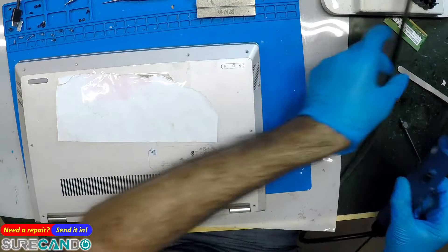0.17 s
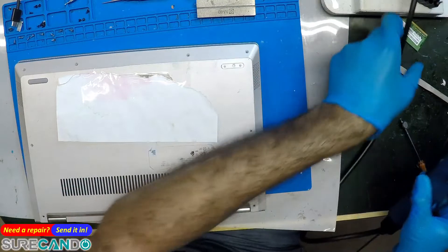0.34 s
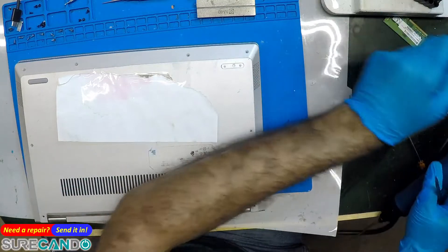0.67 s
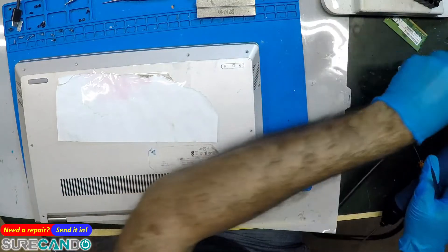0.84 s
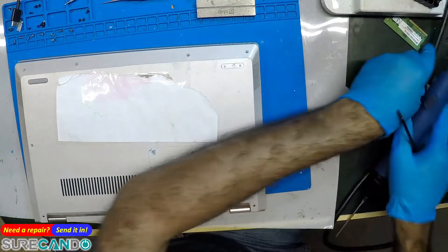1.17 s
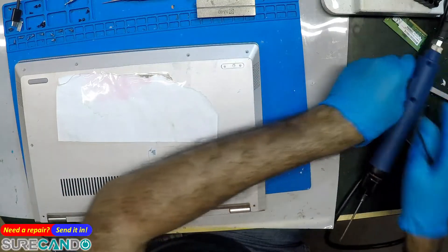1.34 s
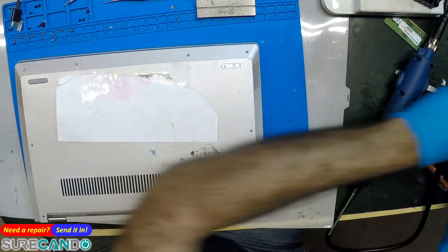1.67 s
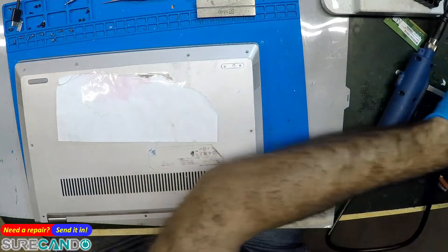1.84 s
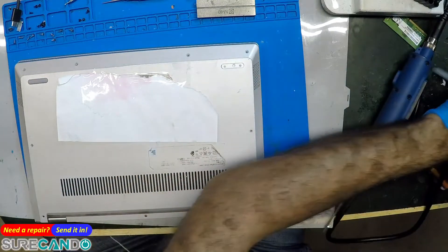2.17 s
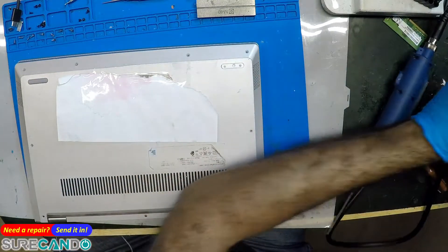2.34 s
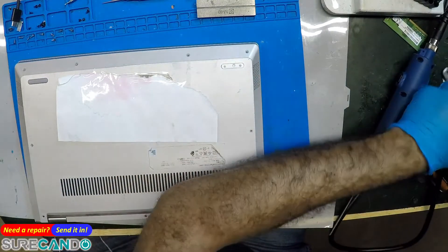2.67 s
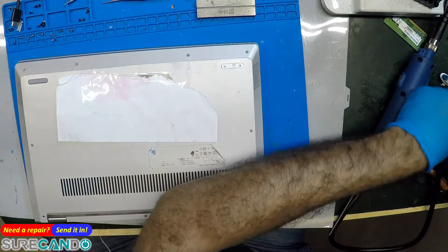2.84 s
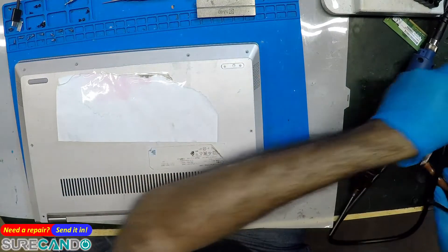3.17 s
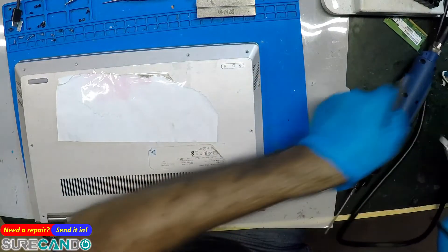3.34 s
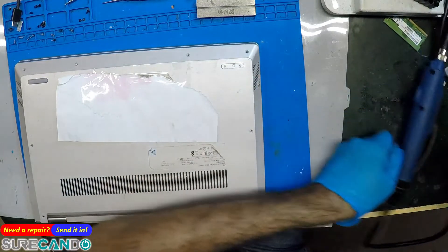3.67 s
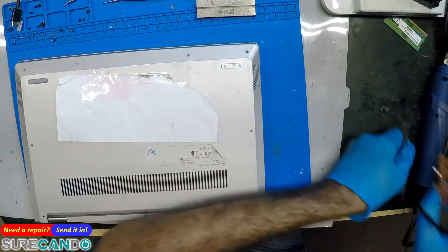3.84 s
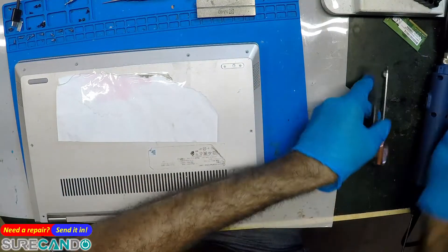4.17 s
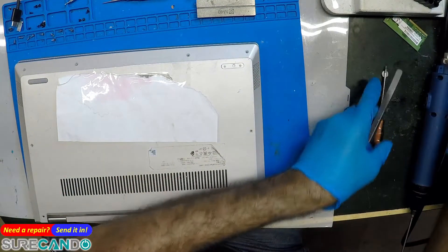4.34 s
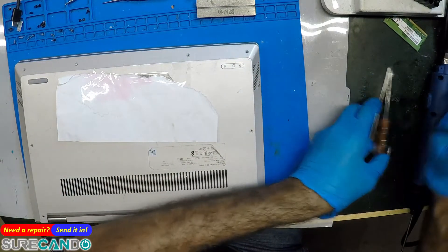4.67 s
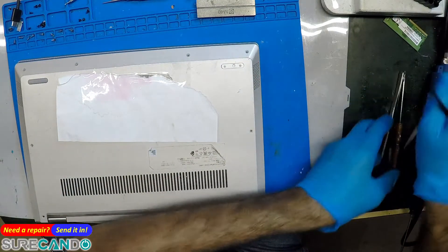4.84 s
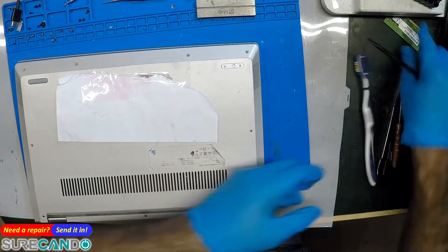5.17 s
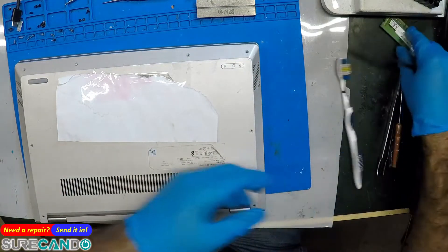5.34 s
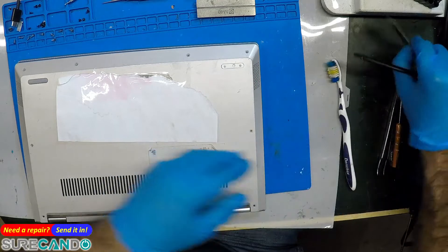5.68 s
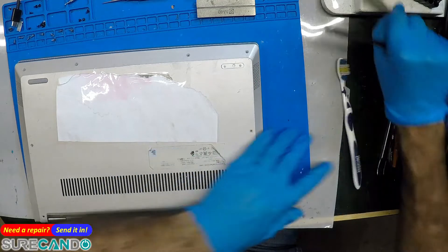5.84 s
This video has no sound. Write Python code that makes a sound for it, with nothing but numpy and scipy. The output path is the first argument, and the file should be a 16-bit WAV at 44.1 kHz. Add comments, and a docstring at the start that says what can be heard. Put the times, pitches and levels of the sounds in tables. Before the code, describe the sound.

Close, nearly mono bench sound with soft fan air behind. A brief buzzy motor burst comes first, then sparse dull knocks and dry plastic ticks. Around the middle, faint metal tinkles and glove rustle thicken into quicker clicks, topped by one strong crack with a low thump. Crisp steel jingles come next, then another firm knock, then quiet rubbing and small ticks in a small room.

```python
"""A fan's air noise hums in a small workshop, then a cordless screwdriver whirrs once on the repair bench.
Handles and cable knock and tick on the bench top as decaying noise through resonances and bench modes.
Steel tweezers, picks and a shaft clink as sums of ringing modes; gloves and cable rub as stick-slip noise.
One close microphone pickup feeds both channels, with a short room tail behind the knocks, ticks, clinks
and motor, and a faint noise of opposite sign in the two channels."""
import sys
import numpy as np
from scipy import signal
from scipy.fft import rfft, irfft
from scipy.io import wavfile
from scipy.ndimage import uniform_filter1d

SR = 44100
rng = np.random.default_rng(int(sys.argv[2]) if len(sys.argv) > 2 else 0)


def to_wav(sig):
    """Store sig (one row per channel, or 1-D mono) as 16-bit WAV at the path in sys.argv[1].

    Samples outside -1..1 are clipped; the rate is SR.
    """
    pcm = np.clip(np.atleast_2d(sig), -1, 1) * 32767
    pcm = np.round(pcm).astype(np.int16)
    wavfile.write(sys.argv[1], SR, pcm.T)  # frames by channels


N = 264996
T = np.arange(N) / SR

# rubbing of gloves and cable: (t/s, drag through the bench level/dB, scrape level/dB)
RUB = [(0.0, -79, -80), (0.37, -62.5, -74), (0.6, -71, -75), (1.34, -64, -71), (2.12, -69.5, -72.5),
       (2.49, -60.5, -69), (2.66, -60.5, -71), (2.83, -81, -81.5), (3.0, -68.5, -75), (3.12, -61.5, -71),
       (3.41, -57, -65.5), (3.62, -63.5, -71), (4.0, -70, -77.5), (4.25, -66.5, -71), (4.57, -64.5, -69.5),
       (4.79, -65, -71), (5.17, -62, -72), (5.66, -67.5, -74.5), (6.01, -70, -87)]
# treble colour of hiss and of the spit in a tick: (f/Hz, level/dB)
HISS = [(2500, -65), (5500, -7), (11000, -8.5), (15500, -19.5)]


def undb(db):
    """Decibels to an amplitude factor."""
    return 10 ** (np.asarray(db) / 20)


def unit(x):
    """Scaled to rms 1."""
    return x / np.sqrt(np.mean(x ** 2))


def peak(x):
    """Scaled to peak 1."""
    return x / np.abs(x).max()


def colour(x, points):
    """Filtered by (f/Hz, level/dB) points, joined by straight lines over log frequency."""
    hz, db = np.transpose(points)
    f = np.maximum(np.arange(len(x) // 2 + 1) * SR / len(x), 1)
    gain = undb(np.interp(np.log(f), np.log(hz), db))
    return irfft(rfft(x) * gain, len(x))


def band(x, hz, width):
    """One resonance, gain 1 at the centre; centre and width in Hz."""
    return signal.lfilter(*signal.iirpeak(min(hz, .45 * SR), hz / width, SR), x)


def walk(rate):
    """Random levels held 1 / rate s and slewed twice; spread near 1."""
    k = int(SR / rate)
    steps = np.repeat(rng.standard_normal(N // k + 1), k)
    return 1.13 * uniform_filter1d(uniform_filter1d(steps, k), k)[:N]


def fade(t, t60):
    """Falls 60 dB in t60 seconds."""
    return np.exp(-np.log(1000) * t / t60)


def ring(modes, t):
    """Every decaying mode of a struck body, a row each, from (f/Hz, level/dB, t60/s)."""
    hz, db, t60 = np.transpose(modes)[:, :, None]
    return undb(db) * np.sin(2 * np.pi * hz * t) * fade(t, t60)


def add(out, s, x):
    """Mixes a sound in at time s."""
    i = int(s * SR)
    out[i:i + len(x)] += x[:len(out) - i]


def grains(shape):
    """Stick-slip noise of uneven size with sparse larger slips, coloured and scaled to rms 1."""
    larger_db = 4.6 * np.minimum(rng.exponential(size=N), 2.5)
    slips = undb(larger_db * (rng.random(N) < .004))
    uneven = undb(3.4 * walk(60) + 0.94 * walk(330))
    return unit(colour(rng.standard_normal(N) * slips * uneven, shape))


def fan():
    """Steady air noise with two duct resonances whose levels waver."""
    # air noise spectrum: (f/Hz, relative level/dB per Hz)
    air_colour = [(15, -32.5), (25, -12), (43, 8.5), (200, -20.5), (256, -9.5), (293, -9), (416, 5),
                  (463, -10), (775, 2), (840, -24.5), (1480, -9.5), (2050, -11.5), (2280, -19),
                  (2690, -24.5), (16000, -29)]
    # duct resonances: (f/Hz, width/Hz, level/dB)
    duct_bands = [(374, 64, -69), (710, 39, -72)]
    air_db, waver_db = -70, 1.5
    out = undb(air_db) * unit(colour(rng.standard_normal(N), air_colour))
    for hz, width, db in duct_bands:
        resonance = unit(band(rng.standard_normal(N), hz, width))
        out = out + undb(db + waver_db * walk(11.0)) * resonance
    return out


def channel_noise():
    """Faint coloured noise that the scene adds to one channel and takes from the other."""
    # spectrum of the noise between the channels: (f/Hz, relative level/dB per Hz)
    side_colour = [(18, -13), (30, 16), (92, -6.5), (119, -3), (426, -14.5), (716, -17.5), (815, -26),
                   (4200, -18), (15000, -35.5)]
    side_db = -81
    return undb(side_db) * unit(colour(rng.standard_normal(N), side_colour))


def room(near):
    """Walls and shelves answer after a few ms with a noise tail, treble dying first."""
    t60_s, room_db = 0.2, -16.5
    t = T[:SR // 2]
    low, high = rng.standard_normal((2, len(t)))
    tail = band(low, 700, 2700) * fade(t, t60_s) + 0.053 * high * fade(t, .5 * t60_s)
    tail = tail * np.clip((t - .002) / 0.013, 0, 1)
    return undb(room_db) * signal.fftconvolve(near, tail / np.sqrt(np.sum(tail ** 2)))[:N]


def rubbing():
    """Slow dragging heard through the bench, as scrape and as hiss; swipes swell the last two."""
    # quick swipes of a glove or bristles: (middle t/s, length/s, scrape level/dB, hiss level/dB)
    swipes = [(0.466, 0.03, -53.5, -61), (1.277, 0.11, -79, -75), (1.859, 0.034, -70, -76),
              (2.056, 0.12, -66, -94), (2.31, 0.091, -69, -65), (3.303, 0.16, -64, -84),
              (3.519, 0.015, -51, -55), (3.776, 0.12, -64.5, -76.5), (4.479, 0.058, -58, -60),
              (4.548, 0.02, -95, -70.5), (4.837, 0.034, -69, -61), (5.575, 0.045, -64.5, -70),
              (4.074, 0.11, -65, -66.5), (5.286, 0.028, -65, -78), (5.914, 0.075, -64, -81),
              (6.0, 0.1, -60, -79)]
    # colour of the scrape: (f/Hz, relative level/dB)
    scrape_colour = [(400, -18), (1100, -3), (3000, -6), (5000, -13.5), (9000, -44)]
    # colour of the drag through the bench: (f/Hz, relative level/dB)
    drag_colour = [(40, -3.5), (120, -1), (400, -3.5), (900, -6), (3000, -60)]
    hiss_under_db = -10.5  # slow hiss against slow scrape
    s, *levels = np.transpose(RUB)
    drag, scrape = (undb(np.interp(T, s, db)) for db in levels)
    hiss = undb(hiss_under_db) * scrape
    for middle, length, scrape_db, hiss_db in swipes:
        swell = np.exp(-8 * ((T - middle) / length) ** 2)
        scrape = scrape + undb(scrape_db) * swell
        hiss = hiss + undb(hiss_db) * swell
    return drag * grains(drag_colour) + scrape * grains(scrape_colour) + hiss * grains(HISS)


def screwdriver():
    """Brush and gear noise throbs mostly twice a shaft turn in the housing; commutator and gears whine."""
    # resonances of the housing: (f/Hz, relative level/dB per Hz)
    housing = [(530, -16), (900, -21), (955, -23), (1450, -12), (1710, -3), (1950, -3.5), (2450, -5),
               (3100, -13), (3700, -11), (4150, -8), (5000, -24), (5770, -12.5), (6200, -25), (7150, -31),
               (9800, -30), (10800, -25), (11900, -27), (12900, -29), (13900, -25), (14700, -35),
               (15500, -39)]
    # whine of commutator and gears: (multiple of the shaft rate, relative level/dB)
    whine_lines = [(4, -19), (10, -10), (10.7, -9), (11, -10), (12.2, -13), (17.9, -15), (20.6, -16),
                   (23.4, -14), (26.3, -21), (30.06, -14), (32.5, -14), (44, -32), (55, -28), (66, -25),
                   (77, -30)]
    shaft_hz = 177.3  # turns per second that the shaft settles around
    start_s, rise_s, stop_s, fall_s = 0.225, 0.028, 0.459, 0.01  # rise is a time constant
    start_db, sag_db_per_s = -48, -22
    on, off = np.maximum(T - start_s, 0), np.maximum(T - stop_s, 0)
    # the shaft comes up to speed in a few hundredths of a second
    speed = 1 - .075 * np.exp(-on / .022) + .001 * walk(30)
    turn = 2 * np.pi * shaft_hz * np.cumsum(speed) / SR  # shaft angle in radians
    throb = 1 + 0.1 * np.cos(turn) + 0.5 * np.cos(2 * turn) + 0.16 * np.cos(0.16 * turn)
    rattle = unit(colour(rng.standard_normal(N) * throb, [(300, -50)] + list(housing)))
    whine = sum(undb(db + 2 * walk(30)) * np.sin(k * turn) for k, db in whine_lines)
    running = (1 - np.exp(-on / rise_s)) * np.maximum(1 - off / fall_s, 0)
    return running * undb(start_db + sag_db_per_s * on) * (rattle + 1.3 * whine)


def ticks():
    """A few cycles of a small stiff part, with a spit of treble; faint random ticks follow the scrape."""
    # hard plastic and cable ticks: (t/s, peak level/dB, centre f/Hz, treble level/dB)
    listed = [(0.2134, -52, 3800, -53), (0.464, -52, 4500, -53), (0.9, -38, 3000, -66),
              (0.9087, -32.5, 2050, -41), (1.135, -51.5, 2820, -74), (1.1583, -47, 2900, -77),
              (1.3545, -43.5, 2780, -52), (1.3655, -46, 2530, -69), (1.4829, -37, 3400, -45.5),
              (1.5535, -52.5, 2800, -76), (1.5735, -53.5, 2430, -76), (1.8452, -43, 2650, -74),
              (1.8553, -42, 2410, -65), (2.0206, -44.5, 2500, -56), (2.0755, -46.5, 3100, -83),
              (2.236, -48.5, 2600, -50), (2.3136, -46, 3850, -55), (2.3266, -41.5, 2870, -50),
              (2.3505, -50, 3140, -70), (2.5282, -43, 3300, -51), (2.5351, -44, 2870, -43),
              (2.6221, -40, 2720, -44), (3.249, -45, 2800, -76), (3.2919, -42, 2770, -68),
              (3.3655, -44, 2760, -59), (3.4343, -34.5, 3120, -48), (3.4444, -43, 3140, -46),
              (3.5082, -33, 3580, -37), (3.5783, -49.5, 2520, -72), (3.6706, -44, 2800, -75),
              (3.71, -42.5, 2870, -52), (3.7494, -43, 2960, -50), (3.7798, -27.5, 2860, -49),
              (3.9726, -41.5, 3470, -49.5), (4.0238, -22.5, 2940, -39), (4.049, -38, 3300, -33),
              (4.054, -39, 3300, -62), (4.064, -46, 3400, -62), (4.099, -40, 3200, -50),
              (4.126, -43, 3020, -41.5), (4.1325, -28.5, 3150, -66), (4.1816, -38.5, 3330, -53),
              (4.189, -36, 3270, -58), (4.2574, -42, 3240, -65), (4.2658, -50, 2980, -76),
              (4.346, -45, 3100, -74), (4.368, -45, 3230, -62), (4.3898, -32, 3270, -26.5),
              (4.426, -37, 3820, -52), (4.445, -43, 3560, -50), (4.4625, -52, 4200, -34),
              (4.4792, -43, 3660, -52), (4.628, -42.5, 3200, -66), (4.663, -44, 3440, -46),
              (4.831, -45, 3950, -51), (4.9703, -29, 3500, -41), (5.0169, -29, 3940, -36.5),
              (5.028, -25, 3530, -28.5), (5.063, -41.5, 3800, -54), (5.158, -52, 2940, -72),
              (5.222, -56, 2996, -69), (5.5814, -46.5, 2940, -54.5), (5.274, -52, 2990, -65),
              (5.892, -49, 3440, -66), ]
    faint_count, faint_hz, pitch_spread = 45, 2900, .08
    over_scrape_db, spread_db, faint_treble_db = 13, 2.5, -20  # treble is against the faint tick
    out, t = np.zeros(N), T[:SR // 12]
    when = rng.uniform(0, T[-1], faint_count)
    size, pitch = rng.standard_normal((faint_count, 2)).T
    rub_s, _, scrape_db = np.transpose(RUB)
    faint_db = np.interp(when, rub_s, scrape_db) + over_scrape_db + spread_db * size
    faint = zip(when, faint_db, faint_hz * (1 + pitch_spread * pitch), faint_db + faint_treble_db)
    for s, db, hz, treble_db in list(listed) + list(faint):
        grit = rng.standard_normal((2, len(t)))
        blow = (t == 0) * 11.9 + grit[0] * fade(t, 0.031)
        click = band(band(band(blow, 0.36 * hz, .5 * hz), 1.053 * hz, .5 * hz), hz, 0.68 * hz)
        spit = colour(grit[1], HISS) * (fade(t, 0.014) + 0.023 * fade(t, 0.053))
        add(out, s, undb(db) * peak(click) + undb(treble_db) * spit)
    return out


def clinks():
    """Four steel tools ring on their own modes, fluttering; loose contact rattles for some ms after a blow."""
    # clinks of steel: (t/s, tweezers level/dB, fine tweezers level/dB, pick level/dB, shaft level/dB,
    # free ringing until touched/s, brightness/dB per octave)
    blows = [(2.496, -74, -63.5, -64.5, -89, 0.02, 1), (2.5276, -80, -63, -51, -73.5, 0.08, -1),
             (2.56, -71, -63, -61, -87, 0.039, -3), (2.603, -72, -72, -77, -90, .004, -2),
             (2.641, -70, -61, -66, -79, 0.032, 4), (4.123, -64, -63.5, -70, -78, .06, -2),
             (4.1787, -75, -80, -79, -83, 0.029, -3), (4.3905, -51, -72, -47, -51.5, 0.05, 5.5),
             (4.4101, -52, -60, -60, -64, 0.057, 5), (4.4638, -54, -79, -58, -75, 0.03, 10),
             (4.4727, -51, -75, -70, -75, 0.018, 8), (4.6314, -48.5, -92, -86, -92, 0.14, -3.5),
             (4.8264, -58, -88, -73, -85, .05, 3), (5.0567, -64.5, -78, -84, -81, 0.05, -9),
             (5.886, -78, -85, -63, -72.5, 0.0036, 4)]
    # modes of each tool: (f/Hz) in the first table, (relative level/dB, t60/s) in the second
    tweezers_hz, tweezers = [7945, 10165, 12240, 14680], [(-14.5, 0.19), (-12, 0.083), (-2, 0.09), (-4, 0.1)]
    fine_tweezers_hz, fine_tweezers = [3740, 7460, 7905, 10125, 12078], [(-5, 0.043), (-14, 0.14), (-8, 0.11),
                                                                 (-2, 0.05), (-5.5, .09)]
    pick_hz, pick = [2891, 4269, 7620, 9770, 12815], [(-7, 0.3), (-13.5, 0.24), (-14.5, 0.22), (-15, 0.31), (-5, 0.14)]
    shaft_modes_hz, shaft_modes = [5130, 5850, 8904, 15480], [(2, 0.21), (5, 0.11), (-3, 0.099), (-11, .08)]
    touched_t60_s = .018  # added decay of steel under a finger
    contact_db = 7  # bright grit of the contact over the strongest tool
    bright_hz = 12000  # pivot of the brightness tilt
    chatter_db, chatter_ms = 4, 4  # loose steel touching its neighbours makes each mode flutter
    spread_db = 1.5  # each clink meets the modes a little differently
    out, t = np.zeros(N), T[:SR // 5]
    pairs = ((tweezers_hz, tweezers), (fine_tweezers_hz, fine_tweezers),
             (pick_hz, pick), (shaft_modes_hz, shaft_modes))
    tools = [np.column_stack(pair) for pair in pairs]
    octaves = np.log2(np.vstack(tools)[:, 0] / bright_hz)
    span = int(chatter_ms * SR / 1000)
    for s, *levels_db, free_s, tilt_db in blows:
        modes = np.vstack([undb(db) * ring(tool, t) for tool, db in zip(tools, levels_db)])
        flutter = np.sqrt(span) * uniform_filter1d(rng.standard_normal(modes.shape), size=span)
        mode_gain = undb(spread_db * rng.standard_normal(len(modes)) + tilt_db * octaves)
        contact = (t == 0) + 0.09 * rng.standard_normal(len(t)) * fade(t, 0.04)
        ringing = mode_gain @ (modes * undb(chatter_db * flutter))
        touched = fade(np.maximum(t - free_s, 0), touched_t60_s)
        ringing = ringing * np.minimum(t / 0.00023, 1) * touched
        # differencing the contact leaves its treble
        bright_grit = undb(max(levels_db) + contact_db) * np.diff(contact, prepend=0)
        add(out, s, signal.fftconvolve(ringing, contact)[:len(t)] + bright_grit)
    return out


def thumps():
    """The bench top flexes under a heavy landing: one low, heavily damped mode."""
    # landings: (t/s, level/dB before damping)
    landings = [(4.0248, -23.5), (4.2, -52)]
    flex_hz, t60_s = 98, 0.027
    out, t = np.zeros(N), T[:SR // 8]
    for s, db in landings:
        add(out, s, -undb(db) * np.sin(2 * np.pi * flex_hz * t) * fade(t, t60_s))
    return out


def knocks():
    """The tool cracks at its own pitch and rings the bench near it; the push of its weight gives the thud."""
    # knocks on the bench: (t/s, crack peak level/dB, crack centre f/Hz, thud peak level/dB, thud centre f/Hz)
    blows = [(0.176, -53.5, 1710, -81, 400), (0.908, -34.5, 735, -52, 700), (0.9128, -38.5, 700, -55, 710),
             (1.0654, -47, 930, -47.5, 455), (1.3537, -43, 1060, -56, 400), (1.3647, -51, 1350, -52, 400),
             (1.485, -42, 1360, -26.5, 356), (1.53, -46, 1480, -45, 300), (1.845, -47, 1170, -77, 400),
             (1.852, -44.5, 1180, -77, 400), (2.021, -54, 1610, -62, 403), (2.1015, -45, 1390, -63, 400),
             (2.2692, -36.5, 1330, -67, 400), (2.329, -48, 1130, -37.5, 420),
             (2.531, -36.5, 1890, -41.5, 410), (2.536, -42.5, 1520, -41, 300), (2.616, -47, 1500, -52, 400),
             (2.624, -39, 1650, -66, 400), (3.21, -58, 870, -53, 400), (3.3668, -52, 1070, -37.5, 400),
             (3.3783, -36.5, 1400, -47, 404), (3.508, -43, 2040, -51, 400), (3.5797, -49, 850, -52, 400),
             (3.758, -42.5, 1460, -52.5, 400), (3.779, -38, 1060, -79, 400),
             (3.973, -38.5, 1000, -48.5, 440), (4.0262, -10, 1560, -23, 620),
             (4.0284, -18.5, 1015, -39.5, 900), (4.371, -50.5, 1450, -66, 397),
             (4.392, -31, 1145, -36, 490), (4.4777, -41, 1000, -41, 480), (4.9698, -40, 1890, -43, 400),
             (4.9852, -46, 1170, -41.5, 400), (5.0286, -24.5, 1650, -35.5, 600),
             (5.0299, -26, 1035, -40, 600), (5.5811, -50.5, 957, -46, 300), (5.924, -53.5, 1320, -54, 504)]
    # modes of the bench: (f/Hz, relative level/dB, t60/s)
    bench_modes = [(122, -1, 0.083), (161, -7.5, 0.12), (253, -14, .04), (300, -6.5, 0.055),
                   (359, -2, 0.066), (440, -8, 0.025), (486, 6, 0.053), (584, 8.5, 0.029), (657, 6, 0.03),
                   (750, -9, 0.019), (890, 3, 0.043), (1063, 4.5, 0.023), (1253, -15.5, 0.021),
                   (1400, -4.5, 0.067), (1610, -1, 0.031), (1752, -3, 0.021), (2040, -7.5, 0.025),
                   (2440, -14.5, 0.04)]
    crack_t60_s = 0.028  # chatter after a blow
    crack_width = 0.73  # width of each crack resonance as a share of its pitch
    weight_db = -28  # slow push against the crack
    spread_db = 2  # each blow meets the modes differently
    push_cycles = .25  # the push lasts about this share of a thud cycle
    out, t = np.zeros(N), T[:SR // 4]
    mode_hz = np.array(bench_modes)[:, 0]
    bench = ring(bench_modes, t)
    for s, db, hz, thud_db, thud_hz in blows:
        mode_gain = undb(spread_db * rng.standard_normal(len(bench_modes)))
        grit = rng.standard_normal((2, len(t)))
        # one blow followed by rough chatter, through a steep resonance
        crack = (t == 0) * 16 + grit[0] * fade(t, crack_t60_s)
        for _ in range(3):
            crack = band(crack, hz, crack_width * hz)
        # whatever lies loose on the bench rattles on and feeds its modes unevenly
        loose = (t == 0) + 0.045 * grit[1] * fade(t, 0.05)
        # modes far from the pitch of the crack are struck less
        near_pitch = undb(-8 * np.log2(mode_hz / hz) ** 2)
        body = signal.fftconvolve(mode_gain * near_pitch @ bench, loose)[:len(t)]
        clatter = unit(band(band(band(grit[1], hz, 1.3 * hz), 0.8 * hz, 1.6 * hz), hz, 2 * hz))
        clatter = clatter * fade(t, 0.13) * np.minimum(t / 0.003, 1)
        # the soft push reaches only the lower modes
        push = np.exp(-(t * thud_hz / push_cycles - 2.5) ** 2)
        uneven_push = signal.fftconvolve(push, loose)[:len(t)]
        thud = signal.fftconvolve(uneven_push, mode_gain @ bench)[:len(t)]
        # the bench top is too small to radiate the deepest bass
        thud = band(band(thud, thud_hz, 2.4 * thud_hz), thud_hz, 2.4 * thud_hz)
        knock = peak(crack) + 0.76 * peak(band(body, hz, hz)) + 0.1 * clatter
        # both parts start just ahead of the listed time
        add(out, s - .0006, undb(db) * knock)
        add(out, s - .002, undb(thud_db) * peak(thud) + undb(db + weight_db) * push)
    return out


def scene():
    """Bench sounds near the microphone, the room's answer, rubbing and the fan behind, in two channels."""
    near = knocks() + thumps() + ticks() + clinks() + screwdriver()
    mid = near + room(near) + rubbing() + fan()
    side = channel_noise()
    return np.array([mid + side, mid - side])


def record(dry):
    """The recorder cuts the top steeply with an elliptic low-pass."""
    top_hz = 15850
    return signal.sosfilt(signal.ellip(10, .2, 60, top_hz, fs=SR, output="sos"), dry)


dry = scene()
out = record(dry)
to_wav(out)
```